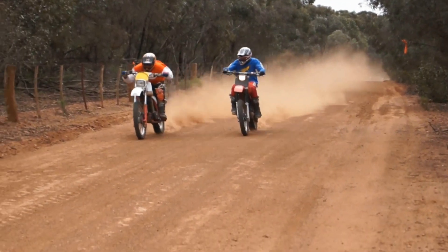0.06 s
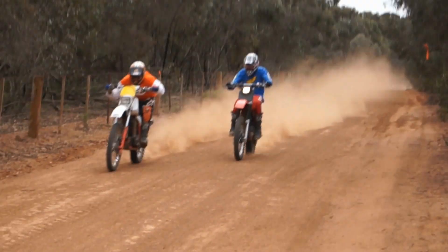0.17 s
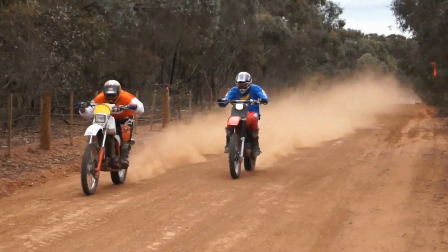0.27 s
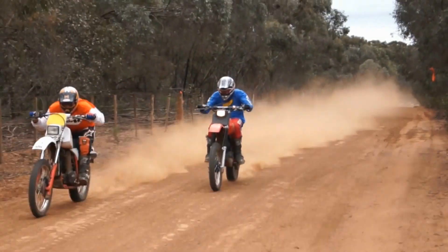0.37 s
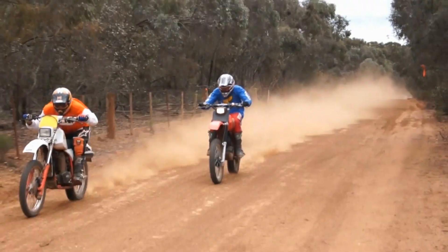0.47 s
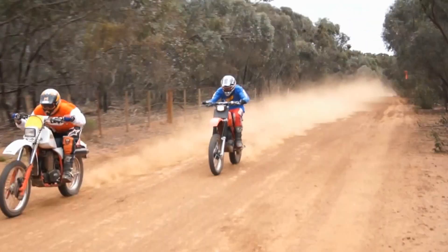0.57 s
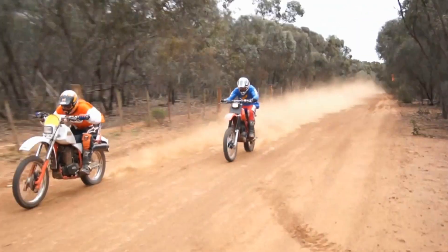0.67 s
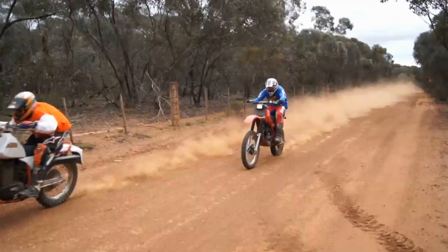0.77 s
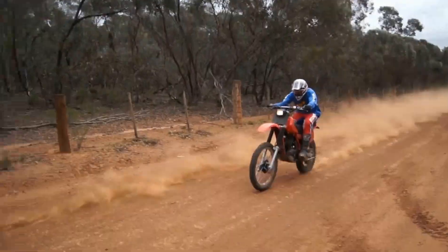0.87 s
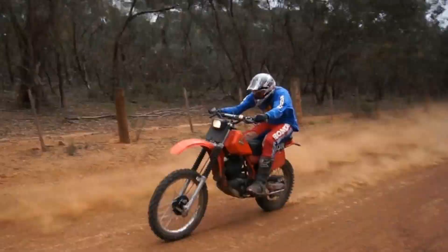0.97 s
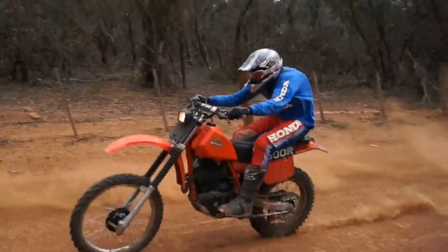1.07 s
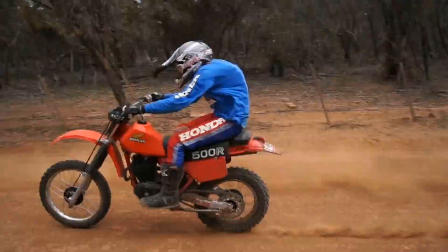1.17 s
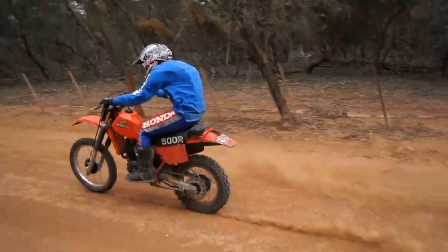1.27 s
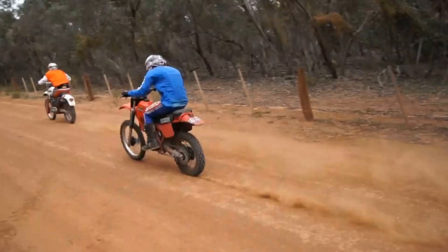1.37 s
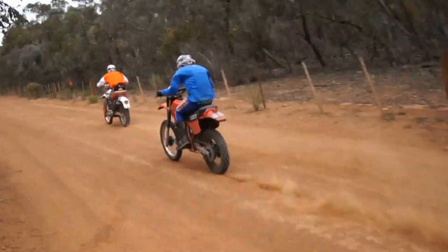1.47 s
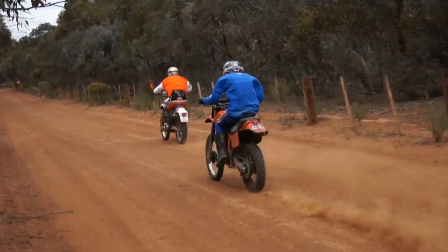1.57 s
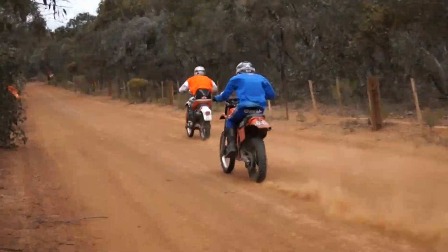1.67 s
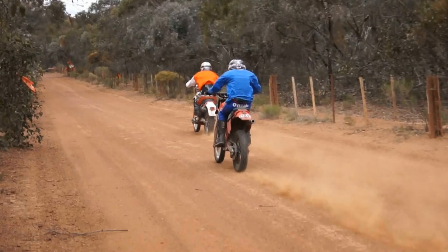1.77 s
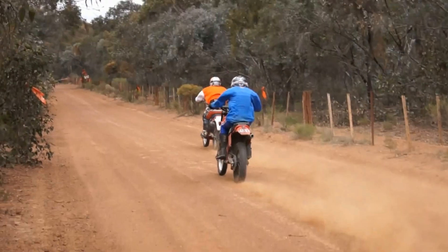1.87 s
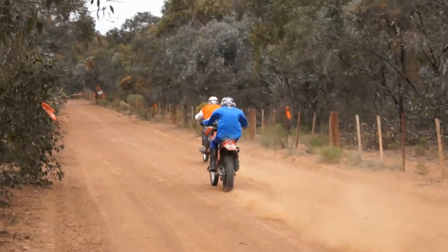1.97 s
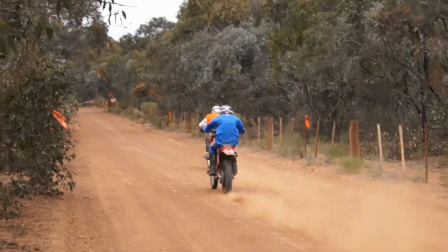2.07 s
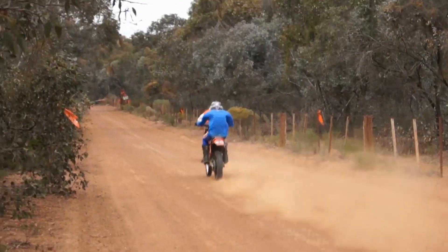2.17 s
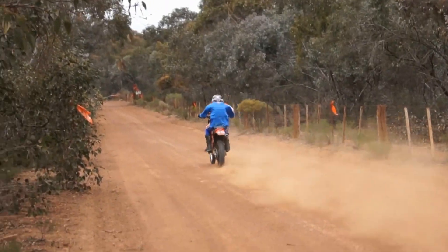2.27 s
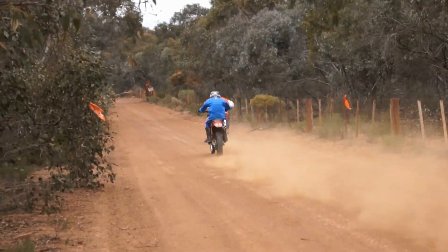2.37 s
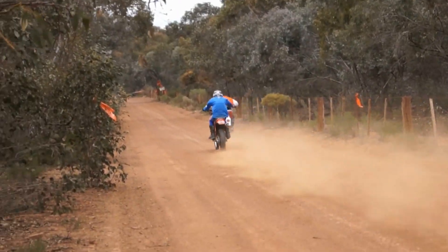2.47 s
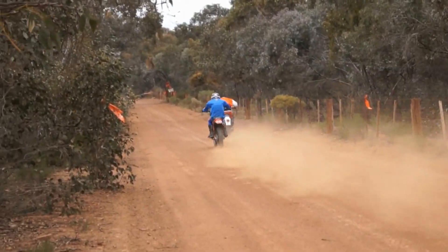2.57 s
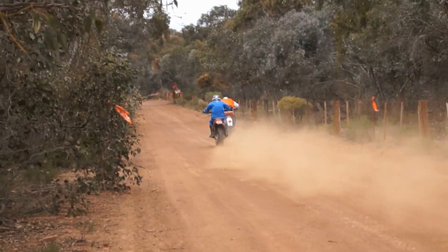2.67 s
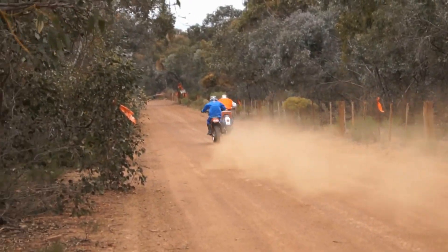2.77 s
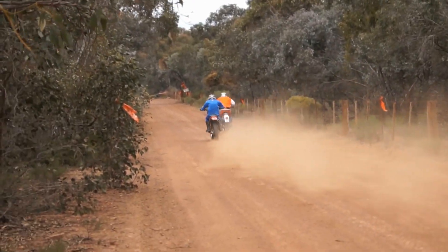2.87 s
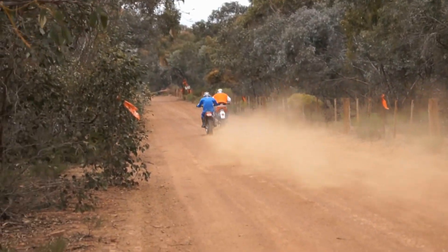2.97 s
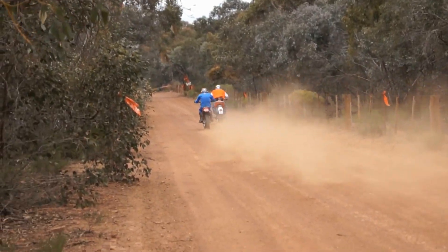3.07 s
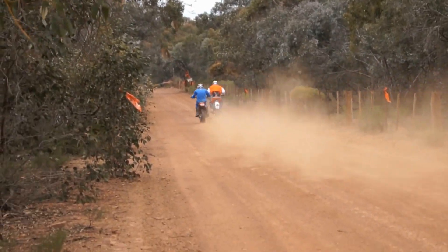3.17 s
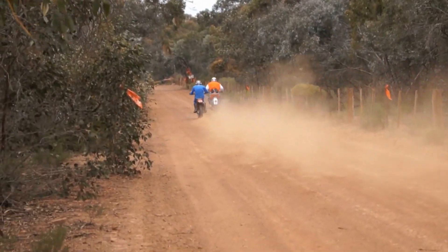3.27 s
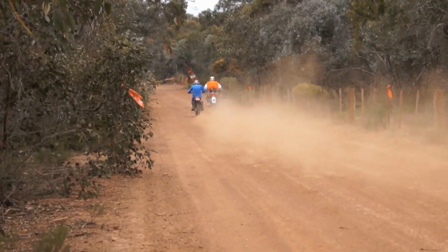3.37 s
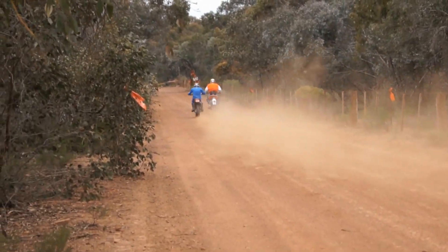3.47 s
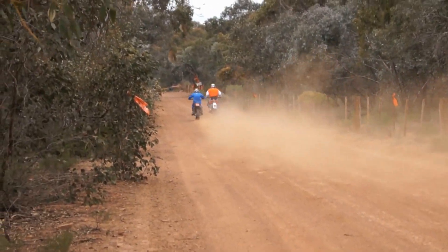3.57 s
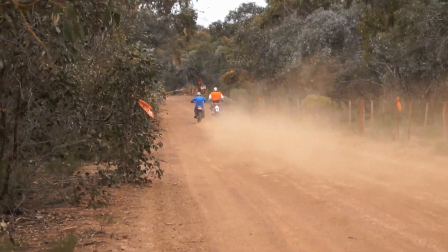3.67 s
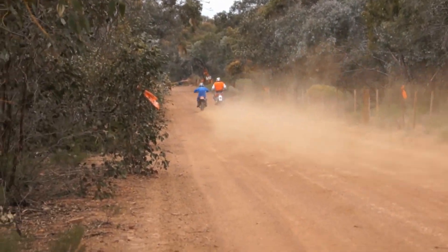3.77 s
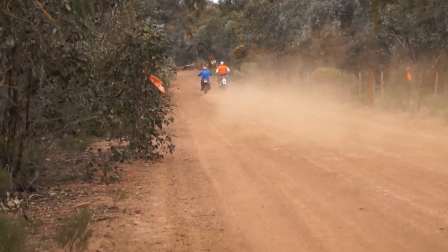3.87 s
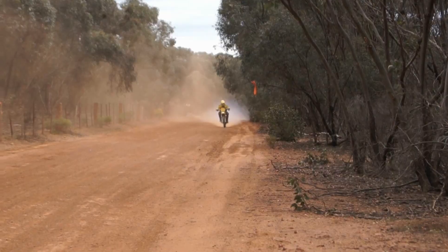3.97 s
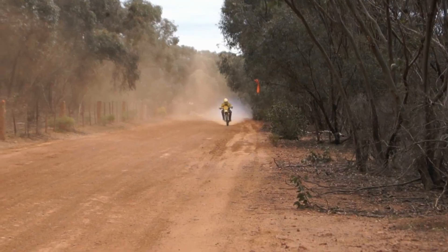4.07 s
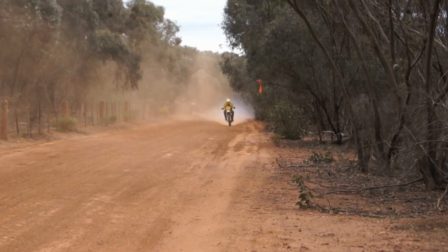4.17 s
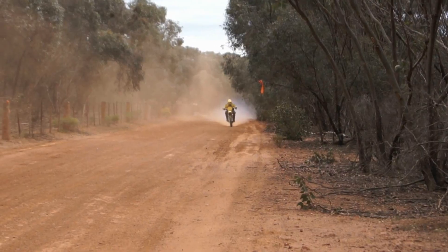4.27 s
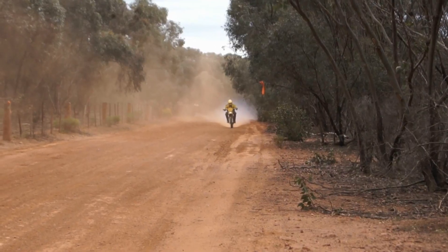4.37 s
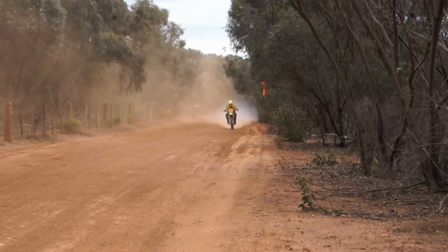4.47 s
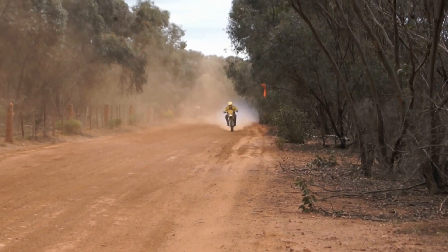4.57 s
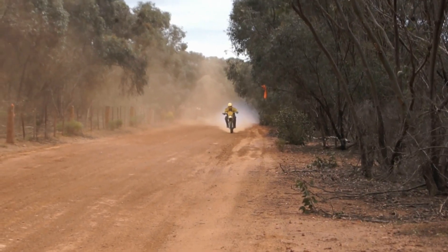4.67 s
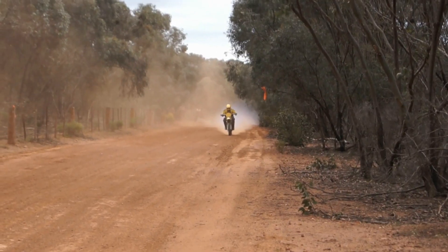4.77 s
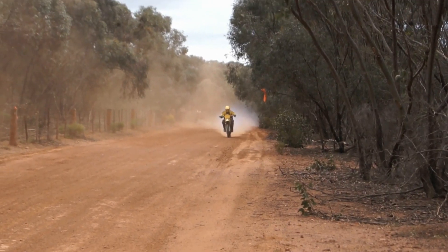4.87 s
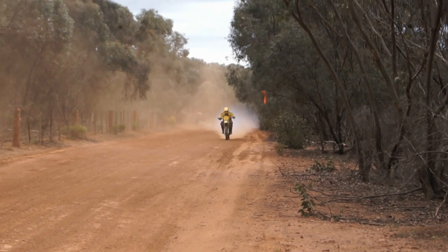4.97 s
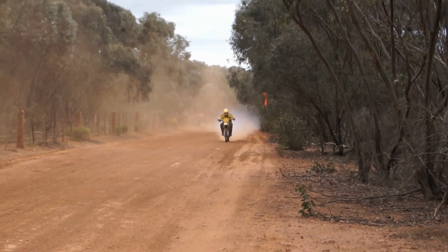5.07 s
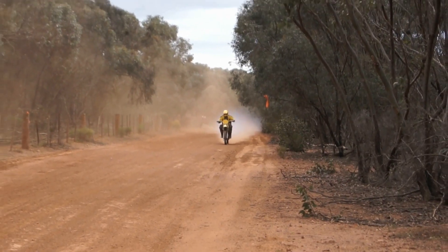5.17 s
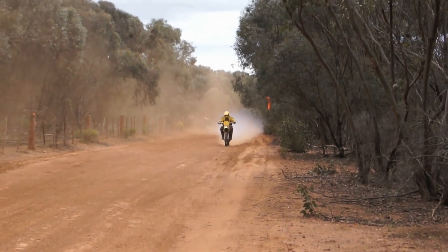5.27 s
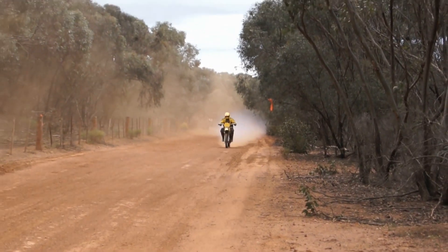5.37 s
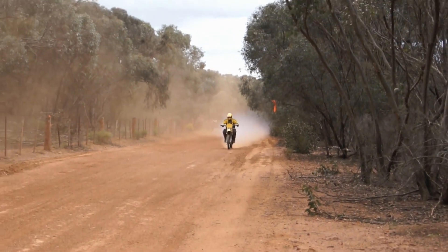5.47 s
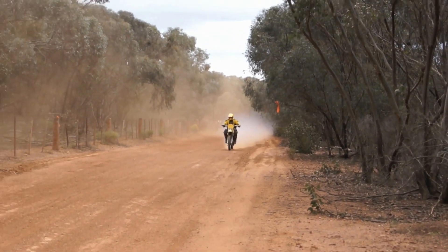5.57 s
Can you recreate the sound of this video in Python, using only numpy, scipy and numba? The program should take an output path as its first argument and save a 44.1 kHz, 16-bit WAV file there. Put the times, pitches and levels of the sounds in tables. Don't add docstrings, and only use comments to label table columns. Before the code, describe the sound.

Outdoors beside a dirt track, overlapping throaty engines with rapid separate firings pass close, with crackling exhaust and gritty tyre hiss. The remaining low-pitched bike changes gear, becomes duller and thinner and dies away by four seconds. After a quiet gap, a higher two-stroke snarl cuts in, fluttering over ruts. Small camera microphone, light wind rumble, short echo from trees.

```python
import sys
import numpy as np
from scipy import signal
from scipy.fft import rfft, irfft, next_fast_len
from scipy.io import wavfile
from scipy.ndimage import uniform_filter1d
from numba import njit

SR = 44100
rng = np.random.default_rng(int(sys.argv[2]) if len(sys.argv) > 2 else 0)


def pcm_store(signal):
    levels = np.round(np.clip(np.atleast_2d(signal), -1, 1) * 32767)
    wavfile.write(sys.argv[1], SR, levels.astype(np.int16).T)


def how_loud(loudness_db):
    steps = np.asarray(loudness_db, float) / 20
    return 10 ** steps


N = 248283
TIME = np.arange(N) / SR
SCENE_END_S = 3.997

# time_s, firing_rate_hz, thump_db, bark_over_thump_db
LEAD_ENGINE = [(0.0, 57.67, -22, 4), (0.07, 56.2, -30, 6.5), (0.36, 57.98, -21.5, -2.5),
               (0.46, 58.9, -23, 3), (0.8, 60.68, -23.5, -1.5), (0.95, 61.06, -32, -0.5),
               (1.12, 56.13, -36, 2), (1.4, 54.68, -46.5, -3)]
CHASER_ENGINE = [(0.0, 49.97, -22.5, 5), (0.27, 50.37, -29, 8.5), (0.33, 39.24, -22.5, 5.5),
                 (0.49, 41.82, -26, 8.5), (0.73, 44.55, -25, 4), (0.94, 45.49, -31, 13),
                 (1.25, 44.88, -32, 11.5), (1.38, 42.73, -25.5, 1.5), (1.85, 43.3, -28.5, 3.5),
                 (1.92, 40.49, -21.5, -2), (2.1, 43.63, -26.5, 1), (2.58, 45.0, -35, 5.5),
                 (2.69, 38.62, -36.5, -7), (2.94, 39.13, -30.5, -2.5), (3.2, 38.44, -30.5, -5),
                 (3.42, 37.36, -35, -6), (3.68, 33.5, -35.5, -6), (4.0, 33.2, -39.5, -9)]
STROKER_ENGINE = [(4.2, 71.86, -28.5, 6), (4.42, 72.83, -25.5, 3), (4.55, 74.57, -25.5, 3.6),
                  (4.87, 74.83, -26, 4.5), (4.96, 73.8, -26, 3.05), (5.06, 74.48, -26, 5.1),
                  (5.5, 74.73, -25, 7), (5.56, 71.03, -25, 9.9), (5.63, 69.4, -25, 13)]
# pitch_hz, width_hz, level_db
LEAD_SILENCER = [(335, 110, -8.5)]
CHASER_SILENCER = [(266, 130, -0.5)]
STROKER_SILENCER = [(168, 100, -1)]
# pitch_hz, width_hz, level_db
LEAD_PIPE = [(498, 56, -6), (1020, 590, -11), (2130, 270, -9.5)]
CHASER_PIPE = [(460, 79, -13.5), (1990, 260, -12.5), (1020, 190, -22.5)]
STROKER_PIPE = [(486, 62, -2), (630, 41, -4), (974, 58, -6), (1946, 55, -6)]
LEAD_RIDE = dict(pass_s=0.81, crack_db=-2.5, rush_db=-53.5, before_db_s=-4, after_db_s=4, pan_db=-2, low_order=4.37, lift_hz=485, rush_dip=0)
CHASER_RIDE = dict(pass_s=.96, crack_db=-1, rush_db=-23, before_db_s=-1.5, after_db_s=10, pan_db=-1, low_order=7.67, lift_hz=710, rush_dip=0.21)
STROKER_RIDE = dict(pass_s=6.7, crack_db=0, rush_db=-24.5, before_db_s=2.5, after_db_s=0, pan_db=-2, low_order=5, lift_hz=714, rush_dip=1)
# time_s, half_length_s, dip_db, rate_sag_hz, phase_step_cycles
GEAR_SHIFTS = [
    (.29, 0.069, 6, 0.0019, 0.83),
    (1.915, 0.053, 10, 0.00093, 0.9),
    (2.615, 0.029, 6, 0, .82),
]
STROKER_DIPS = [(4.356, 0.0549, 2.6, 2.5, 0.004), (4.48, .06, 2.6, 4.5, 0.00064), (4.635, .09, 1.3, 4, 0.00051),
                (4.807, .06, 1.3, 4.5, 0), (4.91, 0.0462, 1.3, 2, 0), (5.012, .05, 1.2, 2.5, 0),
                (5.106, .05, 0.994, 2, 0), (5.216, .05, 1.2, 1.75, 0.0032), (5.316, .055, 0.54, 1.25, 0.00033),
                (5.6, 0.12, 6.5, 0, 0.0089)]
# pitch_hz, level_db
GAS_TONE = [(60, -48.5), (800, -1), (1800, 6.5), (4000, 3), (6000, -8.5), (9000, -16), (13000, -37),
            (16000, -39)]
# pitch_hz, level_db
RUSH_TONE = [(25, -40), (100, -32), (200, -10), (700, -4), (1300, -6), (1900, -4), (4000, -9), (6500, -20),
             (10000, -33), (16000, -55)]
# pitch_hz, width_hz, level_db
FINS = [(1900, 160, -2), (2780, 120, -8), (3800, 110, 0), (5440, 120, -6)]
# time_s, lost_share
HOLLOW = [
    (1.85, 0.1),
    (2.15, 0.85),
    (2.58, 0.88),
    (2.63, 0),
]
# pitch_hz, width_hz, level_db
HOLLOW_BAND = [(144.72, 110, 0)]
# pitch_hz, difference_db
PORT_DIFFERENCE = [(30, -17), (120, -40.5), (500, -13), (900, -10.5), (2000, -6), (4000, -3.5),
                   (8000, -6.5), (15000, -5)]
# pitch_hz, width_hz, dip_db
BODY_NOTCHES = [(605, 36, -3), (1402, 360, -11), (2374, 98.5, -29), (3430, 395, -11)]


def bike(engine, span_s, silencer, pipe, ride, start_cycles, jitter_s, scatter_db, puff_s, snap,
         bounce_s, bounce, fins_db, widths_hz, dips=()):
    heard = slice(int(span_s[0] * SR), int(span_s[1] * SR))
    t = TIME[heard]
    n = len(t)
    hz, db, bark_db, crack_db, rush_db, pan_db, low_hz, lift_hz = pass_by(t, engine, dips, **ride)
    at, strength_db = firings(t, hz, start_cycles, jitter_s, scatter_db, dips)
    low, mid, high = (clicks(at, each_db, n) for each_db in strength_db)
    mid = mid + bounce * clicks(at + bounce_s * SR, strength_db[0], n)
    puff = signal.lfilter([1], [1, -np.exp(-1 / (puff_s * SR))], uniform_filter1d(high, size=56))
    gas = gas_crack(high, puff, snap)
    deep = silencer_thump(low, silencer, low_hz, widths_hz[0])
    bark = pipe_bark(mid, puff, pipe, lift_hz, widths_hz[1])
    pulses = deep + how_loud(bark_db) * bark
    pulses = signal.lfilter(*signal.butter(2, 3000, fs=SR), pulses)
    sound = ports(pulses, 0.64 * scatter(pulses, t60_s=0.014))
    sound = sound + how_loud(crack_db) * gas + how_loud(rush_db) * road_rush(n, fins_db)
    out = np.zeros((2, N))
    out[:, heard] = sound * how_loud(db + np.array([pan_db, -pan_db]) / 2)
    return out


def pass_by(t, engine, dips, pass_s, crack_db, rush_db, before_db_s, after_db_s, pan_db,
            low_order, lift_hz, rush_dip):
    speed_m_s, closest_m = 9.97, 3.08
    turn_s, turn_spread_s = 0.28, 0.024
    time_s, *columns = np.transpose(engine)
    hz, db, bark_db = (np.interp(t, time_s, column) for column in columns)
    dip = sag_hz = 0
    for when, half_s, dip_db, each_sag_hz, _ in dips:
        shape = np.cos(np.clip((t - when) / half_s, -1, 1) * np.pi / 2) ** 2
        dip = dip + dip_db * shape
        sag_hz = sag_hz + each_sag_hz * shape
    far_m = np.hypot(speed_m_s * (t - pass_s), closest_m)
    near = (closest_m / far_m) ** 2
    facing = np.tanh((t - pass_s - turn_s) / turn_spread_s)
    bark_db = bark_db - 0.53 * dip
    crack_db = bark_db + crack_db + 7 * facing - 0.65 * far_m - 0.5 * dip
    rush_loss_db = np.minimum(around(t, pass_s, before_db_s, after_db_s), 18.5)
    rush_db = rush_db - rush_loss_db - 3 * facing - rush_dip * dip - (db - dip)
    pan_db = pan_db + 2.5 * near
    lift_hz = lift_hz * (1 + 0.3 * near)
    low_hz = np.minimum(low_order * hz, 332)
    return hz - sag_hz, db - dip, bark_db, crack_db, rush_db, pan_db, low_hz, lift_hz


def around(t, pass_s, before, after):
    return np.where(t < pass_s, before * (pass_s - t), after * (t - pass_s))


def firings(t, hz, start_cycles, jitter_s, scatter_db, dips):
    cycles = start_cycles + np.cumsum(hz) / SR
    for when, *_, phase_step_cycles in dips:
        cycles = cycles + phase_step_cycles * (t > when)
    at = np.interp(np.arange(1, cycles[-1]), cycles, np.arange(len(t)))
    chance = rng.standard_normal((500, 4))[:len(at)].T
    return at + jitter_s * SR * chance[0], scatter_db * chance[1:]


def silencer_thump(low, silencer, low_hz, width_hz):
    lifted = sweep(sweep(low, low_hz, width_hz), low_hz, 2 * width_hz)
    return unit(ring(low, silencer) + lifted)


def pipe_bark(mid, puff, pipe, lift_hz, width_hz):
    drive = unit(mid) + 0.4 * unit(puff * rng.standard_normal(len(mid)))
    return unit(ring(drive, pipe) + sweep(drive, lift_hz, width_hz))


def gas_crack(high, puff, snap):
    noise = rng.standard_normal((2, len(high)))
    return unit(colour(unit(puff * ports(noise[0], noise[1])) + snap * unit(high), GAS_TONE))


def road_rush(n, fins_db):
    noise = rng.standard_normal((4, n))
    rush = unit(colour(ports(noise[0], noise[1]), RUSH_TONE)) * how_loud(wander(24.7, n))
    shaking = signal.lfilter(*signal.butter(4, 6500, fs=SR), ports(noise[2], noise[3]))
    return rush + how_loud(fins_db + 2.75 * wander(18, n)) * unit(ring(shaking, FINS))


def cross_hollow(sound):
    return sound - np.interp(TIME, *np.transpose(HOLLOW)) * ring(sound, HOLLOW_BAND)


def tree_echo(mid):
    trees = ports(scatter(mid, t60_s=0.4), scatter(mid, t60_s=0.4))
    return colour(trees, [(100, -17.5), (400, -1.5), (1500, -6.5), (6000, -7)])


def dull_air(sound):
    top_db = 7.5 - around(TIME, CHASER_RIDE["pass_s"], 13.5, 2.5)
    top_db = np.where(TIME < 2.6, top_db, -18.5)
    for edge_hz in (9800, 11500):
        top = colour(sound, [(0.7 * edge_hz, -40), (edge_hz, 0), (20000, 0)])
        sound = sound + (how_loud(0.62 * top_db) - 1) * top
    return sound


def wind_rumble(mid):
    noise = rng.standard_normal(N) + 0.5 * rng.standard_normal((2, N))
    wind = colour(noise, [(15, 4), (40, 2), (70, 6), (100, -12), (200, -45)])
    loud = np.sqrt(np.maximum(uniform_filter1d(mid ** 2, int(0.19 * SR)), 0))
    level_db = -15.5 + (TIME > SCENE_END_S)
    return how_loud(level_db) * loud * unit(wind)


def ports(mid, side):
    return mid + colour(side, PORT_DIFFERENCE) * np.array([[1], [-1]])


def scatter(x, t60_s):
    t = np.arange(int(t60_s * SR)) / SR
    tail = rng.standard_normal(SR)[:len(t)] * np.exp(-np.log(1000) * t / t60_s)
    return signal.fftconvolve(x, tail / np.linalg.norm(tail))[:len(x)]


def clicks(at, db, count):
    out, at = np.zeros(count + 1), np.clip(at, 0, count - 1)
    whole = at.astype(int)
    np.add.at(out, whole, how_loud(db) * (1 - at + whole))
    np.add.at(out, whole + 1, how_loud(db) * (at - whole))
    return out[:count]


def ring(x, modes):
    total = 0
    for k, (hz, width_hz, db) in enumerate(modes):
        b, a = signal.iirpeak(hz, hz / width_hz, SR)
        total = total + (-1) ** k * how_loud(db) * signal.lfilter(b, a, x)
    return total


@njit
def sweep(x, hz, width_hz):
    out, band, low = np.empty(len(x)), 0., 0.
    for i in range(len(x)):
        g, k = np.tan(np.pi * hz[i] / SR), width_hz / hz[i]
        v = (band + g * (x[i] - low)) / (1 + g * (g + k))
        band, low, out[i] = 2 * v - band, low + 2 * g * v, k * v
    return out


def notch(x, hz, width_hz, db):
    w, root = 2 * np.pi * hz / SR, how_loud(db / 2)
    a = np.sin(w) * width_hz / hz / 2
    top = [1 + a * root, -2 * np.cos(w), 1 - a * root]
    bottom = [1 + a / root, -2 * np.cos(w), 1 - a / root]
    return signal.lfilter(top, bottom, x)


def colour(x, points):
    hz, db = np.transpose(points)
    size = next_fast_len(x.shape[-1])
    bins = np.maximum(np.arange(size // 2 + 1) * SR / size, 1)
    gain = how_loud(np.interp(np.log(bins), np.log(hz), db))
    return irfft(rfft(x, size) * gain, size)[..., :x.shape[-1]]


def wander(rate_hz, count):
    size = int(SR / rate_hz)
    steps = np.repeat(rng.standard_normal(count // size + 1), size)[:count]
    return unit(uniform_filter1d(steps, size))


def unit(x):
    return x / np.sqrt(np.mean(x ** 2))


def scene():
    lead = bike(LEAD_ENGINE, (0, 1.4), LEAD_SILENCER, LEAD_PIPE, LEAD_RIDE,
                start_cycles=0.3, jitter_s=0.00008, scatter_db=1.0, puff_s=0.0024, snap=0.2,
                bounce_s=0.00413, bounce=0.56, fins_db=-30.5, widths_hz=(80., 100.))
    chaser = bike(CHASER_ENGINE, (0, 4.05), CHASER_SILENCER, CHASER_PIPE, CHASER_RIDE,
                  start_cycles=0.4, jitter_s=0.0001, scatter_db=1.05, puff_s=0.0034, snap=0.25,
                  bounce_s=0.00416, bounce=0.23, fins_db=-28, widths_hz=(170., 170.), dips=GEAR_SHIFTS)
    stroker = bike(STROKER_ENGINE, (4.2, 5.63), STROKER_SILENCER, STROKER_PIPE, STROKER_RIDE,
                   start_cycles=0.72, jitter_s=0.00014, scatter_db=1.4, puff_s=0.006, snap=0.05,
                   bounce_s=0.004433, bounce=0.67, fins_db=-2.5, widths_hz=(220., 70.), dips=STROKER_DIPS)
    direct = how_loud(-3.5) * lead + how_loud(-2.0) * cross_hollow(chaser) + how_loud(-1.0) * stroker
    mid = direct.mean(axis=0)
    return dull_air(direct + tree_echo(mid)) + wind_rumble(mid)


def scene_change(t):
    fade_start_s, fade_db_s = 3.435, 26.5
    next_scene_s, ramp_s = 4.284, 0.0048
    after_s = np.clip(t - SCENE_END_S, 0, 1)
    tail = 0.3 * np.exp(-after_s / 0.012) * (after_s < 0.04)
    first = np.where(after_s > 0, tail, 1) * how_loud(-fade_db_s * np.clip(t - fade_start_s, 0, 1))
    return np.where(t < next_scene_s, first, np.clip((t - next_scene_s) / ramp_s, 0, 1))


def band_limit(x):
    return signal.sosfilt(signal.butter(12, 15700, fs=SR, output="sos"), x)


def record(dry):
    x = dry
    for hz, width_hz, db in BODY_NOTCHES:
        x = notch(x, hz, width_hz, db)
    wind_cut = signal.butter(4, 150, "high", fs=SR, output="sos")
    x = how_loud(2.5) * (signal.sosfilt(wind_cut, x) + how_loud(-27.0) * x)
    x = x * how_loud(np.array([[-0.9], [0.9]]))
    x = x * scene_change(TIME)
    x = x / (1 + x ** 6) ** (1 / 6)
    x = signal.sosfilt(signal.ellip(8, 0.2, 60, 15300, fs=SR, output="sos"), x)
    return band_limit(x)


dry = scene()
out = record(dry)
pcm_store(out)
```